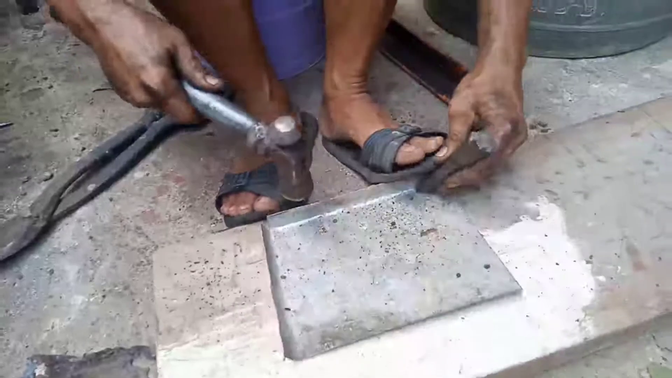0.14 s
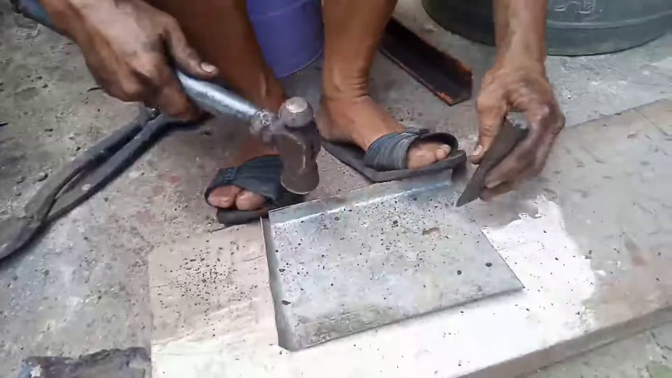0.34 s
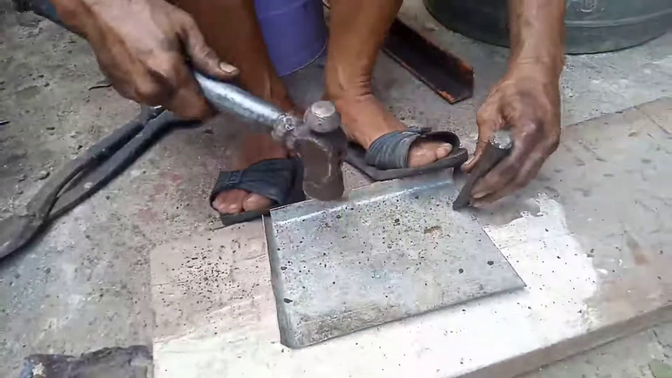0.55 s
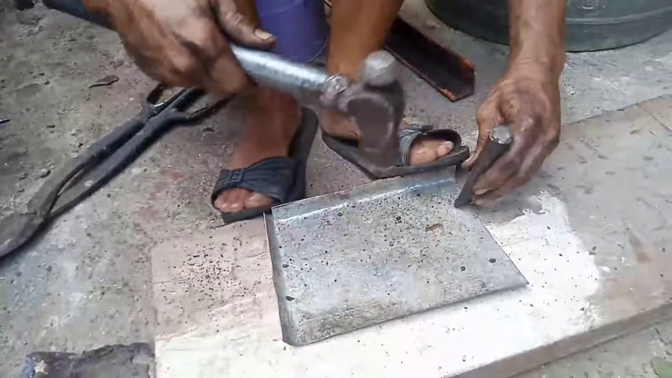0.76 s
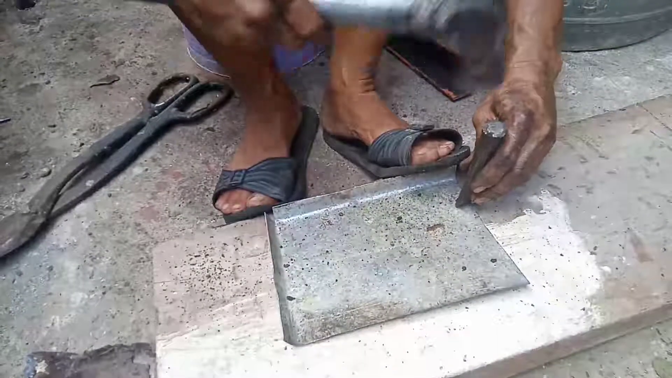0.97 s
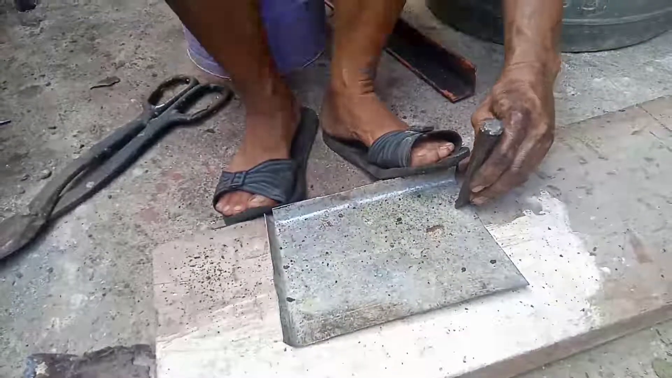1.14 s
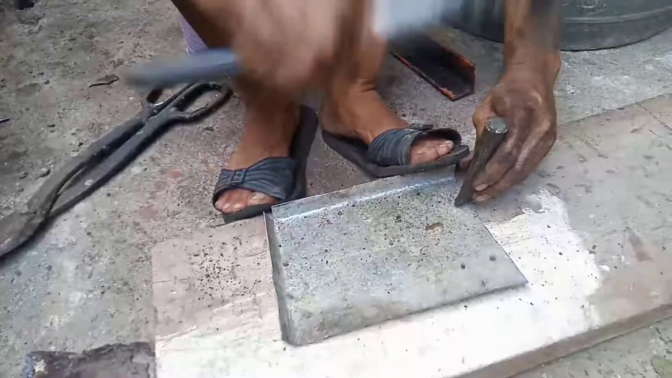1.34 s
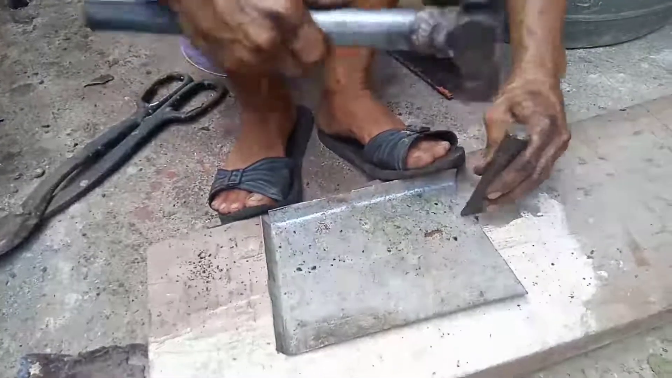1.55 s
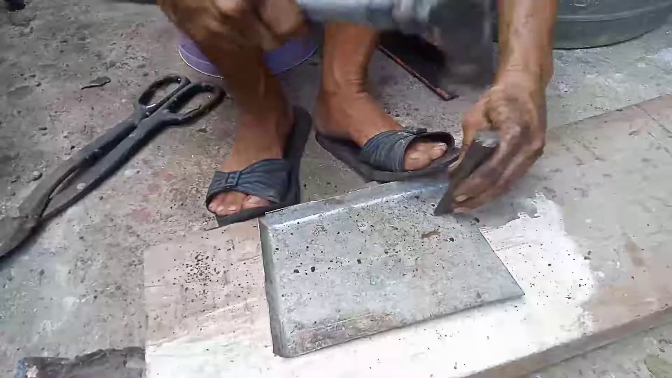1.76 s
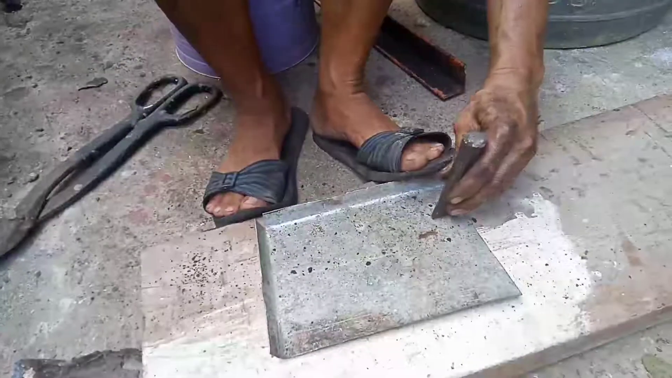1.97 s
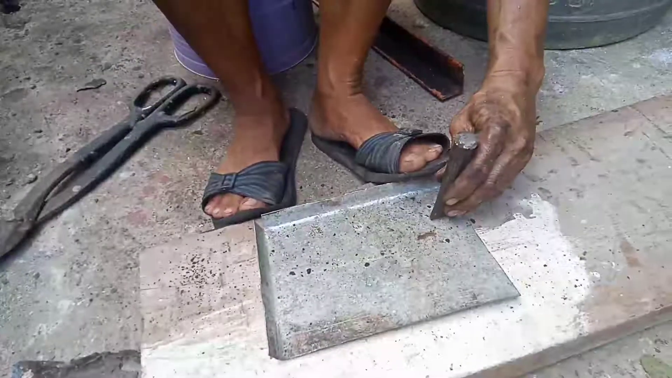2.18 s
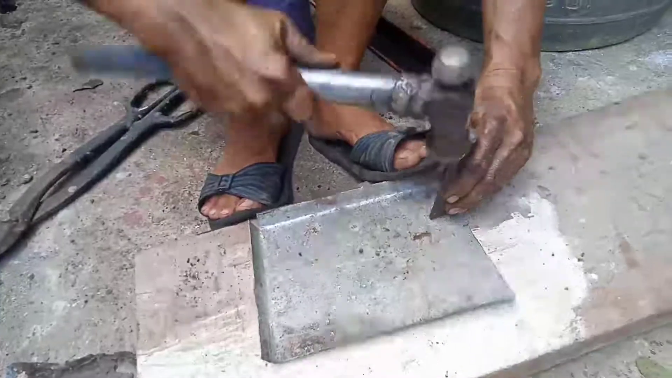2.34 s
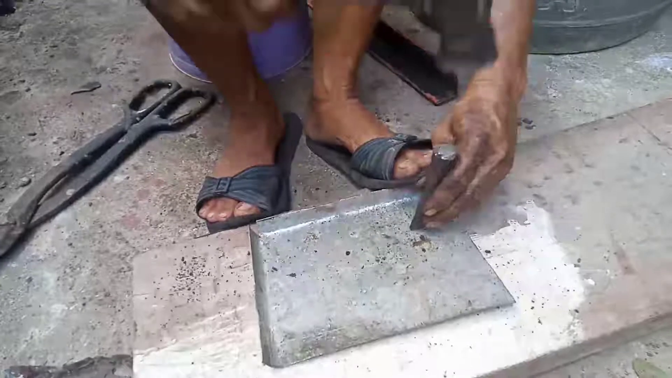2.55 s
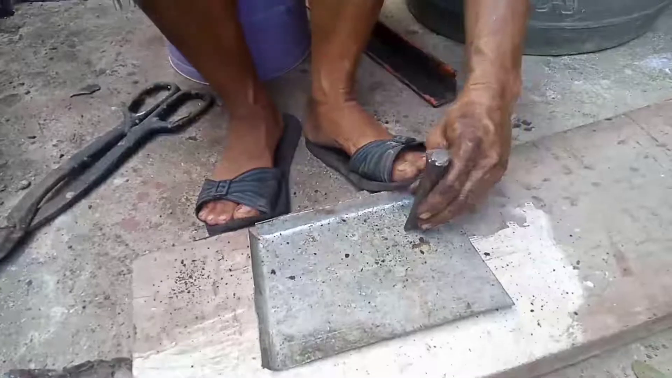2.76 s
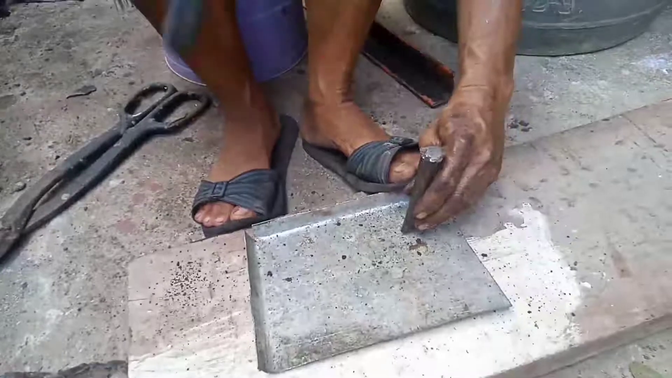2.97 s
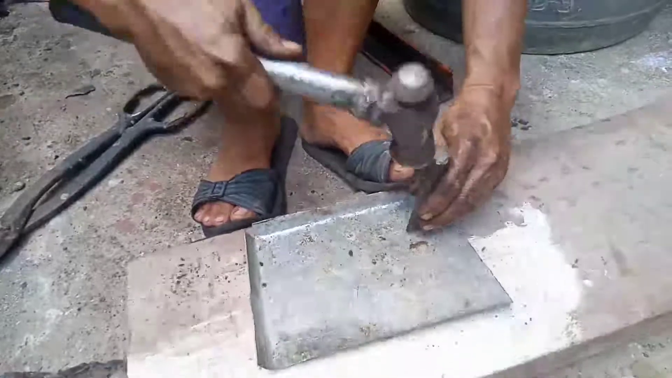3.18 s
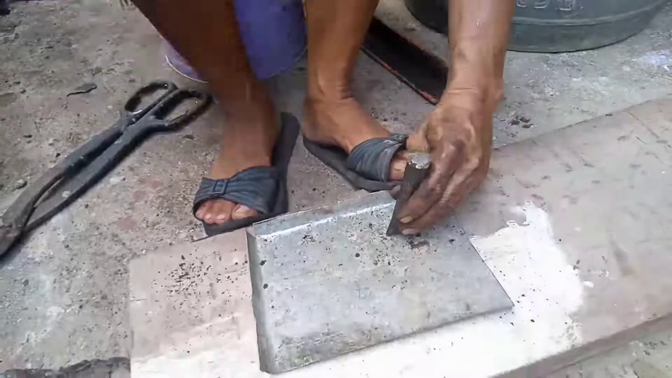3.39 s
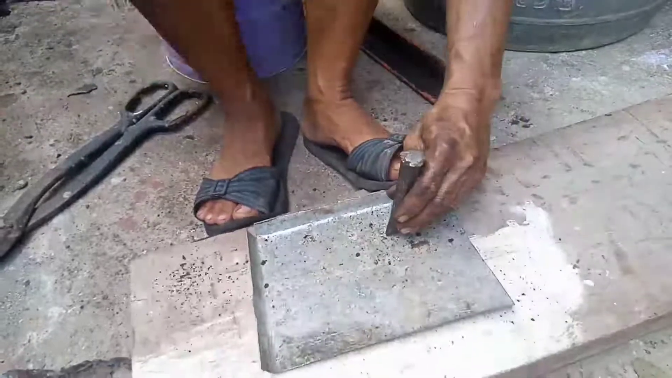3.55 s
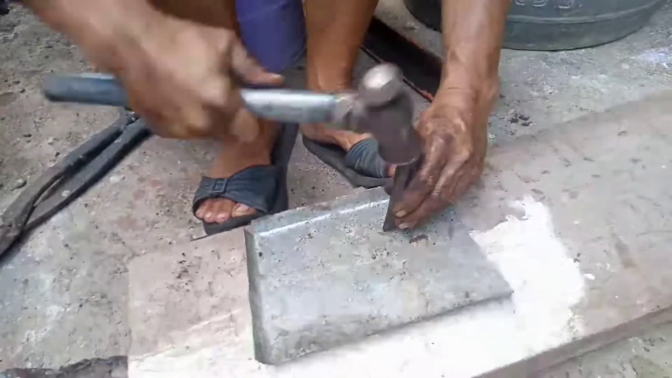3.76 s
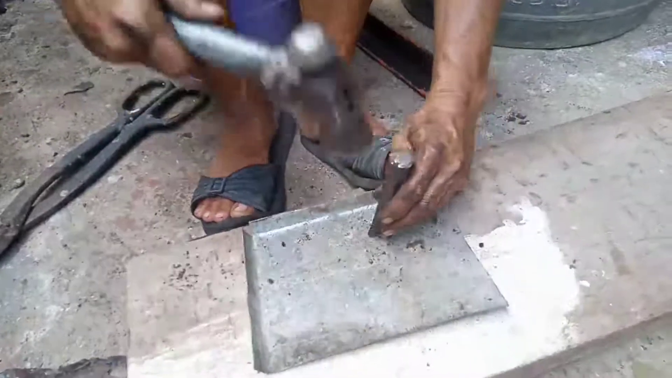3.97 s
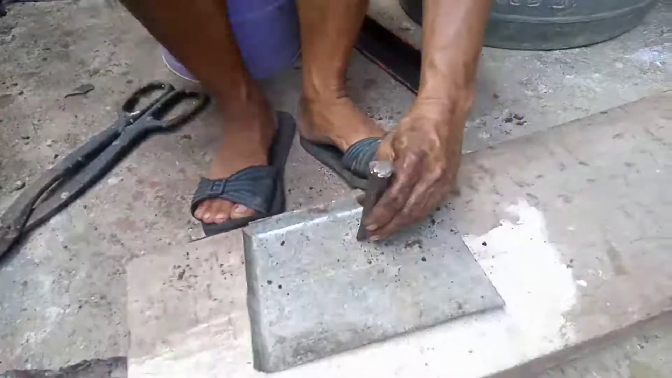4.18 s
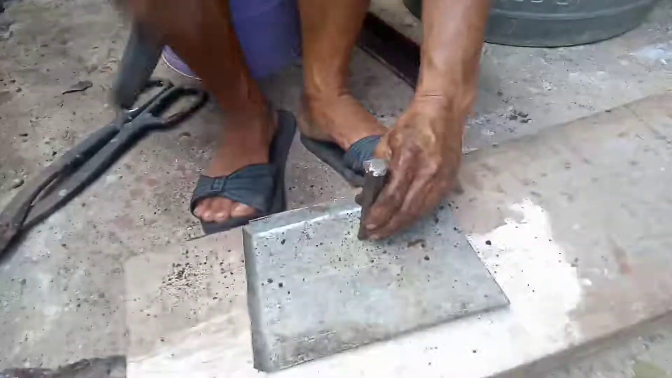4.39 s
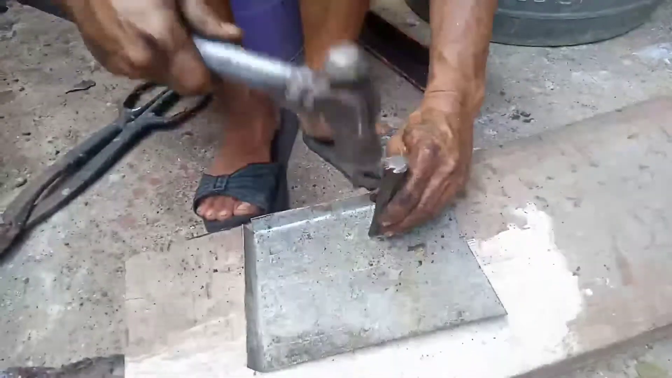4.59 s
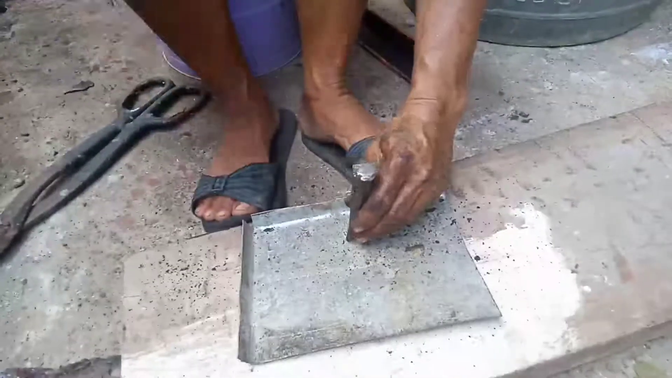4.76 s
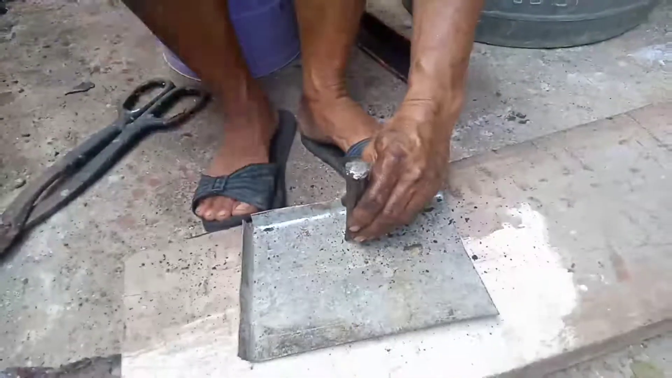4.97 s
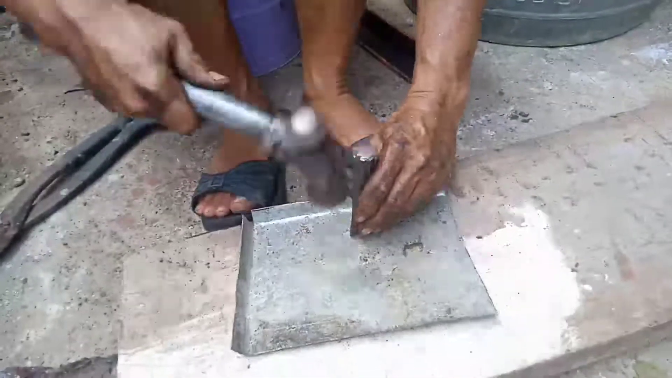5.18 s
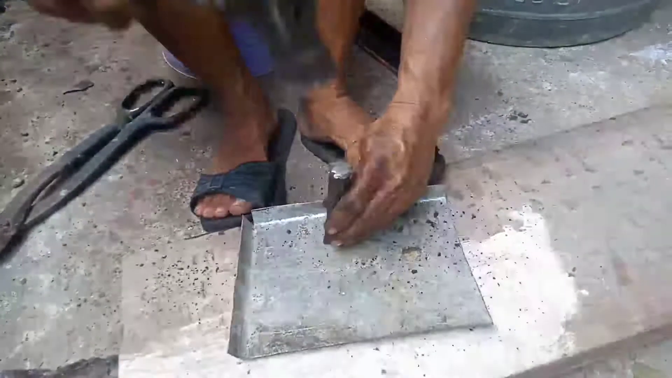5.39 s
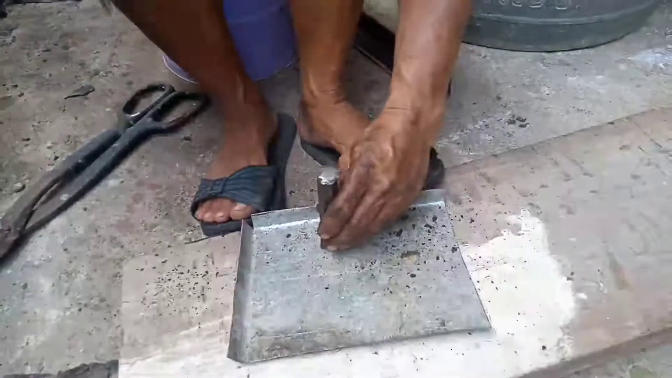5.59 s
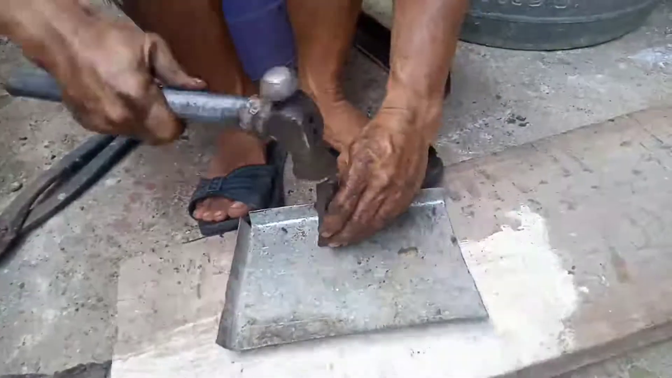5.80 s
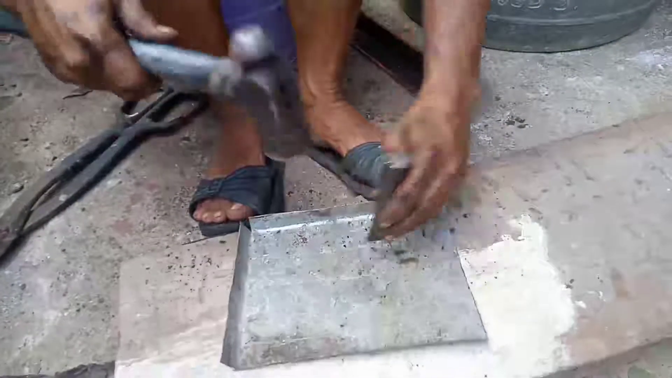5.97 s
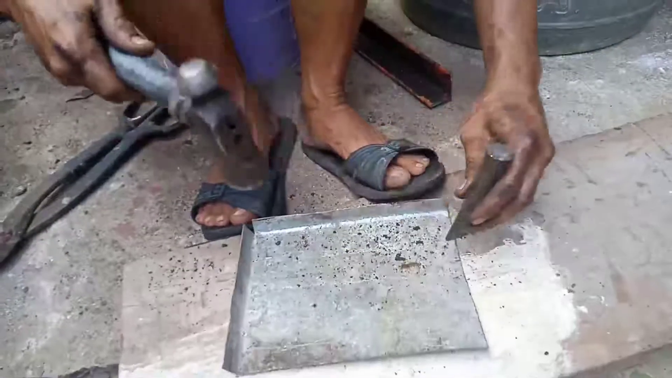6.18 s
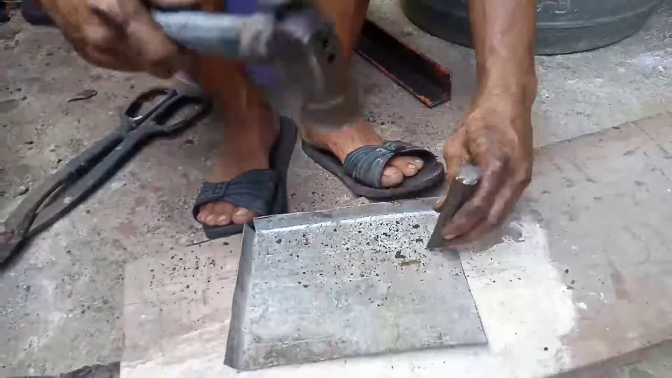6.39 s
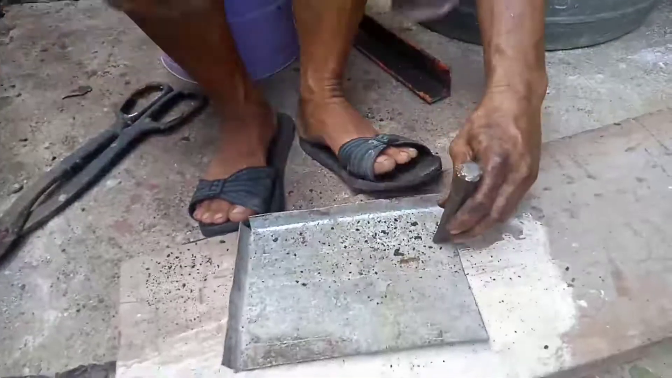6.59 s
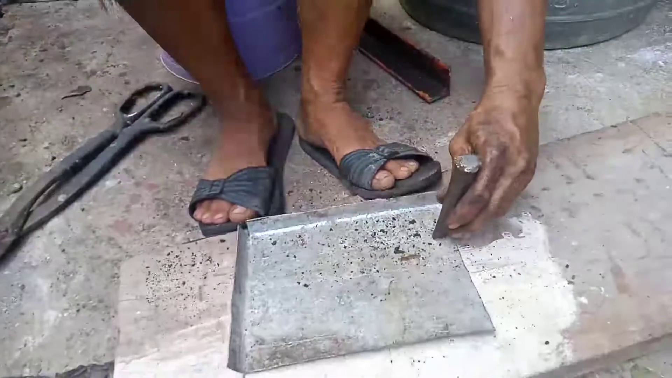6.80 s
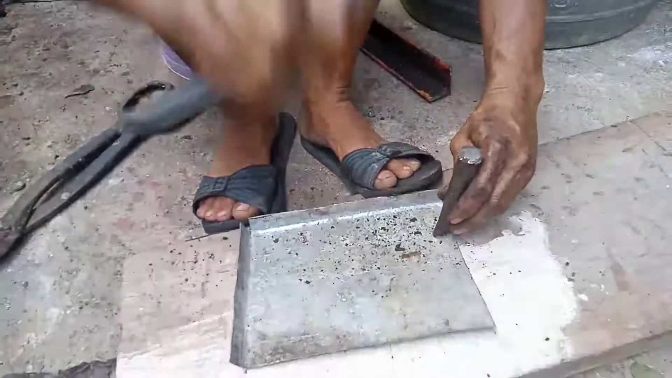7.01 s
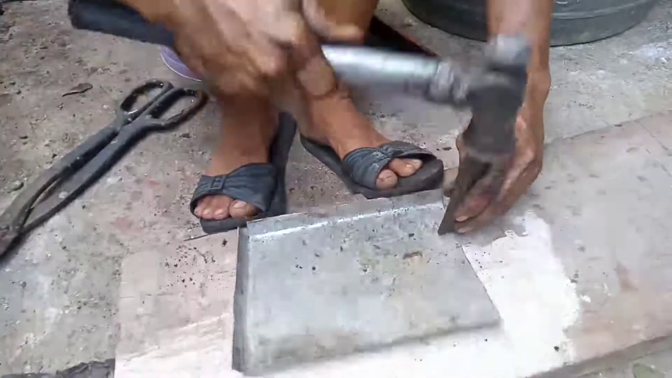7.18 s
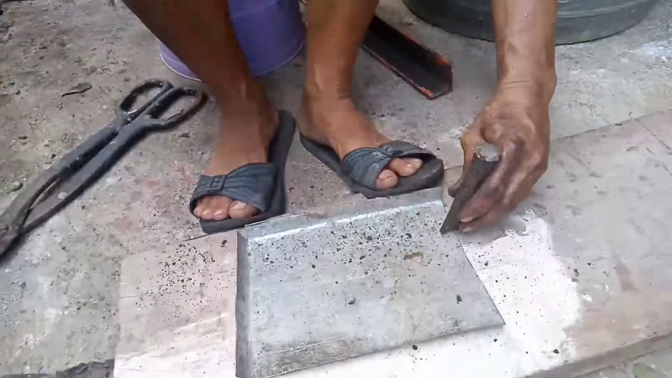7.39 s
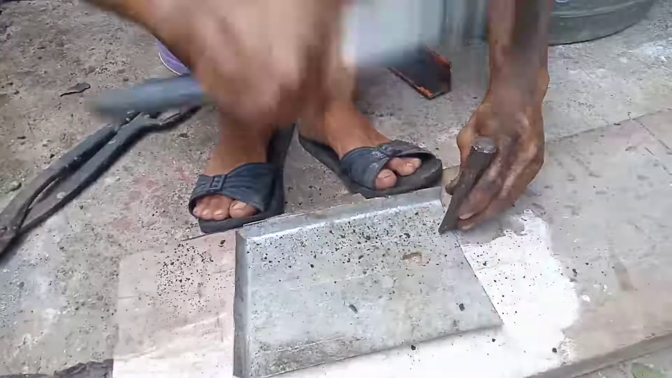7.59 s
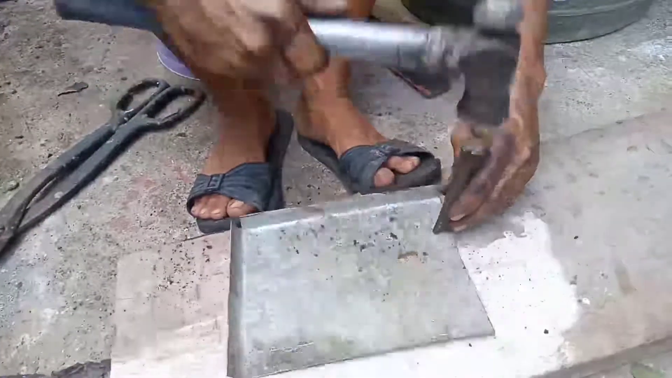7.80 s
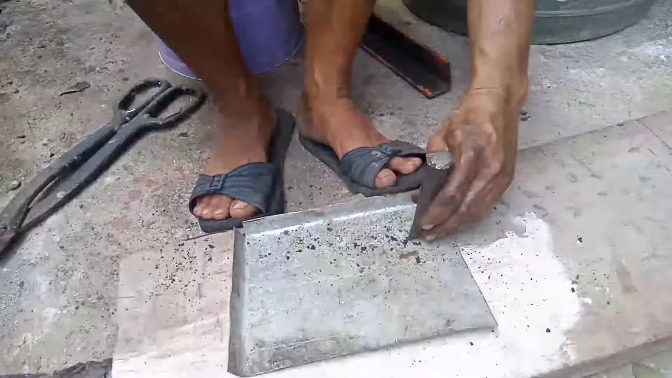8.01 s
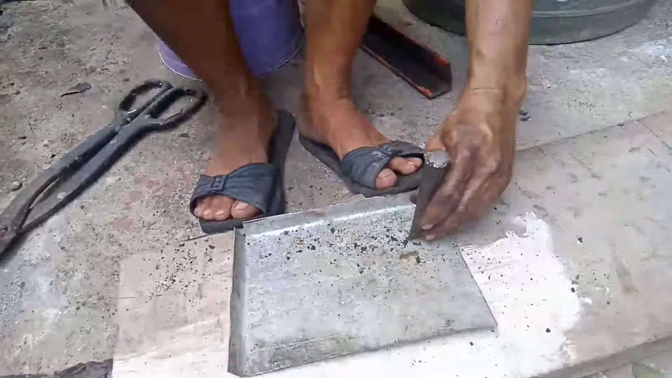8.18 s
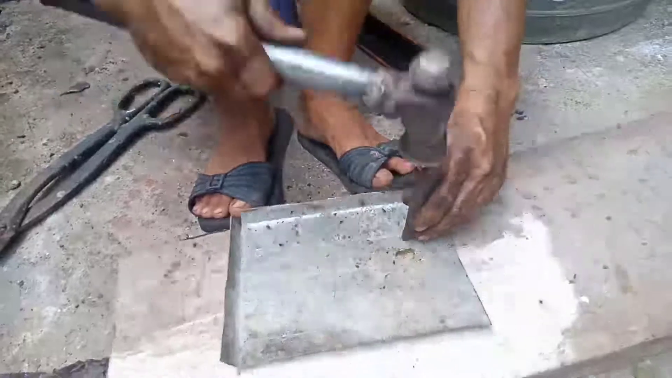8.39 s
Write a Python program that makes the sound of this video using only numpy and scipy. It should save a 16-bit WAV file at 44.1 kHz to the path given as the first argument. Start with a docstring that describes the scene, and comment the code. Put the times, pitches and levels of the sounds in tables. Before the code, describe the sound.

Harsh, distorted metal clangs from hand chiselling a steel sheet, one roughly every 0.7 seconds, with light rattles and faint squeaks between.

```python
"""Chiselling a steel sheet by hand

Ten hammer blows on a chisel, close to a small microphone, ring a steel sheet lying on a wooden block.
Blows and lighter taps are decaying modes over dense clatter; loose steel chinks in short modes and grit.
Narrow noise bands squeak, low noise puffs, faint wavering tones come and go; shaped noise hums behind.
The recorder looks ahead, ducks before every blow, overloads, and lifts the tail as its gain returns."""
import sys
import numpy as np
from scipy import signal
from scipy.io import wavfile
from scipy.ndimage import uniform_filter1d, minimum_filter1d

SR = 44100
rng = np.random.default_rng(int(sys.argv[2]) if len(sys.argv) > 2 else 0)


def store_wav(level_fs):
    """Save 16-bit WAV to argv[1]."""
    pcm = np.round(np.clip(np.atleast_2d(level_fs), -1, 1) * 32767)
    wavfile.write(sys.argv[1], SR, pcm.T.astype(np.int16))


N = 372644


def gain_of(db):
    """Decibels to amplitude gain."""
    return 10 ** (np.asarray(db) / 20)


def evened(x):
    """Scales to rms 1."""
    return x / np.sqrt(np.mean(x ** 2) + 1e-20)


def read(points, hz):
    """Reads a spectrum table on a log-frequency axis."""
    f, value = np.transpose(points)
    return np.interp(np.log(hz + 1), np.log(f + 1), value)


def add(mix, s, sound):
    """Mixes a sound in at time s; what falls outside the mix is cut."""
    at = round(s * SR)
    part = mix[max(at, 0):][:len(sound) + min(at, 0)]
    part += sound[max(-at, 0):][:len(part)]


def noise(count, level_db, size=512):
    """Random spectral frames shaped by level_db(Hz, s), joined into a noise of count samples."""
    hop = size // 4
    frames = count // hop + 5
    hz = np.fft.rfftfreq(size, 1 / SR)[:, None]
    real, imaginary = rng.standard_normal((frames, len(hz), 2)).T
    spectrum = (real + 1j * imaginary) * gain_of(level_db(hz, np.arange(frames) * hop / SR))
    return signal.istft(spectrum, nperseg=size, noverlap=size - hop)[1][:count]


def blow(db, rattle, ring, bright_db, low_db, pair_db, thud_db):
    """Clear modes over a dense clatter; the sheet rattles on the block, which then damps it fast."""
    # clearest modes of the sheet: (frequency [Hz], relative level [dB], 60 dB decay before the ring factor [s])
    sheet = [(325.2, -18.5, 0.37), (651.4, -6.5, 0.43), (781, 1.5, 0.55), (808, 0.5, 0.55), (873, -6, 0.48),
             (1098, -23.5, .5), (1196, -9.5, 0.67), (1388, 0.5, 0.59), (1469, 3.5, 0.25), (1544, -6, 0.41),
             (1679, -1.5, 0.56), (1994, -17, 0.69), (2021, -3, 0.55), (2261, -2.5, 0.52), (2412, -27, .5),
             (2550, -8.5, 0.88), (2710, -44.5, 0.35), (2930, -5, 0.62), (3067, 2.5, 0.26),
             (3262, -12, 0.42), (3450, -9.5, 0.49), (3450, -10, .4), (4140, -9.5, 0.47)]
    # dense unresolved modes: (frequency [Hz], relative level [dB])
    clatter = [(30, -55.5), (100, -23), (216, -7.5), (330, -4.5), (427, -14), (700, -2.5), (1020, -12.5),
               (2070, -7), (3570, -14), (4500, -25), (5330, -43.5), (8800, -47.5), (10500, -51),
               (15000, -50)]
    # their 60 dB decay before the ring factor: (frequency [Hz], decay [s])
    clatter_t60 = [(60, 0.19), (250, 0.26), (700, 0.56), (2000, 0.56), (4000, 0.44), (7000, 0.61),
                   (10500, 0.43), (14000, 0.222)]
    lowest_below_hz, pair_below_hz = 700, 830
    t = np.arange(SR) / SR

    hz, mode_db, t60 = np.transpose(sheet)[:, :, None]
    luck = rng.standard_normal((len(sheet), 3)).T[:, :, None]
    mode_db = mode_db + 2.5 * luck[0] + bright_db * np.log2(hz / 1500)
    mode_db = mode_db + np.select([hz < lowest_below_hz, hz < pair_below_hz], [low_db, pair_db])
    detuned_hz = hz * (1 + 0.00508 * luck[1])
    modes = gain_of(mode_db - 60 * t / (t60 * ring)) * np.sin(2 * np.pi * (detuned_hz * t + luck[2]))

    clusters_db = 4 * rng.standard_normal((257, 1))  # each blow favours other groups of modes

    def dense_db(f, s):
        tilt_db = bright_db * np.log2((f + 50) / 1500)
        return read(clatter, f) + clusters_db + tilt_db - 60 * s / (read(clatter_t60, f) * ring)

    dense = noise(SR, dense_db, size=512)
    thud = noise(SR, lambda f, s: -22 * abs(np.log2((f + 5) / 110)) - 60 * s / 0.27, size=2048)

    # the deep modes escape part of the damping and linger: rise [dB/s], up to [dB]
    linger_db = np.minimum(35.5 * np.maximum(t - rattle, 0), 1)
    modes = modes * np.where(hz < pair_below_hz, gain_of(linger_db), 1)
    ringing = modes.sum(0)

    head = SR // 20  # the parts are balanced over their first 50 ms
    body = gain_of(-5.0) * ringing / ringing[:head].std() + dense / dense[:head].std()
    body = body + gain_of(thud_db) * thud / thud[:head].std()

    bumps = evened(signal.oaconvolve(rng.standard_normal(SR), np.hanning(400), "same"))
    # fast damping begins after the rattle, over a weak remainder
    damped = gain_of(-60 * np.maximum(t - rattle, 0) / (0.21 * ring)) + gain_of(-26.5)
    damped = damped * gain_of(1.2 * bumps)  # the level flickers
    onset = 1 - np.exp(-t / .0006)
    return gain_of(db) * body * damped * onset


def chink(db, middle_db, top_db, grit_db):
    """A short ring of stiff steel in which close modes can beat; a rough contact starts it."""
    # modes of the loose steel: (frequency [Hz], relative level [dB], 60 dB decay [s])
    steel = [(2000, -11, .04), (2552, -3, .06), (2697, 0, .045), (3235, -10, .025), (4160, -18, .05),
             (4880, 3, .045), (4990, 0, .04), (7100, -14, .05), (7560, -3, .06), (7650, 0, .11),
             (8300, -12, .03), (11500, -24, .04)]
    t = np.arange(SR // 5) / SR
    hz, mode_db, t60 = np.transpose(steel)[:, :, None]
    luck = rng.standard_normal((len(steel), 2)).T[:, :, None]
    # middle modes lie from 4500 to 6000 Hz, top modes above
    mode_db = mode_db + 2.5 * luck[0] + middle_db * (hz > 4500) + (top_db - middle_db) * (hz > 6000)
    detuned_hz = hz * (1 + 0.0052 * luck[1])
    ring = (gain_of(mode_db - 60 * t / t60) * np.sin(2 * np.pi * detuned_hz * t)).sum(0)

    scrape = rng.standard_normal(200) * np.exp(-np.arange(200) / 60.0)  # the contact lasts a few ms
    scrape[0] = 7  # its first touch is the hardest
    ring = signal.oaconvolve(ring, scrape / np.linalg.norm(scrape))[:len(t)]

    def contact_db(f, s):
        middle_hump_db = -34 * abs(np.log2((f + 50) / 3000))
        top_hump_db = top_db - 60 * abs(np.log2((f + 50) / 7700))
        return np.maximum(middle_hump_db, top_hump_db) - 60 * s / .045

    grit = noise(len(t), contact_db, size=128)
    both = ring + gain_of(grit_db) * grit / grit[:200].std()
    return gain_of(db) * both * (1 - np.exp(-(t / .0015) ** 2))


def chatter(length, db):
    """Loose steel repeats faint chinks at uneven short gaps, starting softly."""
    gap_s, spread_db = .011, 1.5
    rise_db, rise_s = 5.5, 0.018
    out = np.zeros(SR // 2)
    luck = rng.standard_normal((14, 2))
    for k, (late, loud) in enumerate(luck):
        s = gap_s * (k + .3 * late * (k > 0))
        level_db = db + spread_db * loud - rise_db * np.exp(-s / rise_s)
        sound = chink(level_db, middle_db=-17.5, top_db=-42, grit_db=-12.5)
        add(out, s, sound * (s < length))
    return out


def whistle(length, hz, width, db):
    """Slow complex noise carried on a pitch: a narrow squeaking band that swells quickly and fades."""
    count = round(length * SR)
    slow = rng.standard_normal((2, SR))
    slow = signal.lfilter([1], [1, -np.exp(-np.pi * width / SR)], slow, axis=1)
    slow = signal.lfilter([1], [1, -np.exp(-2 * np.pi * width / SR)], slow, axis=1)[:, -count:]
    carrier = np.exp(2j * np.pi * hz * np.arange(count) / SR)
    band = ((slow[0] + 1j * slow[1]) * carrier).real
    fade = gain_of(-15. * np.arange(count) / count)
    return gain_of(db) * evened(band) * signal.windows.tukey(count, .45) * fade


def puff(length, hz, db):
    """A lump of low noise as the arm swings past the microphone."""
    count = round(length * SR)
    air = noise(SR // 4, lambda f, s: -14 * abs(np.log2((f + 20) / hz)) + 0 * s, size=1024)
    return gain_of(db) * evened(air[2000:][:count]) * np.hanning(count)


def tone(length, hz, db):
    """A near-steady tone that grows slowly and wavers a little in pitch and level."""
    t = np.arange(round(length * SR)) / SR
    waver = evened(signal.oaconvolve(rng.standard_normal((2, len(t))), np.hanning(3000)[None], "same"))
    turns = np.cumsum(hz + 4 * waver[0]) / SR
    level = gain_of(db + 1.5 * waver[1] + 5 * t / length)
    return level * np.sin(2 * np.pi * turns) * signal.windows.tukey(len(t), .3)


def hum():
    """Workshop background: shaped noise with small lumps, raised and lowered by the recorder's slow gain."""
    # spectrum of the background: (frequency [Hz], relative level [dB])
    hum_spectrum = [(15, -52.5), (30, -25.5), (49, -28.5), (100, -2.5), (301, -5), (404, -12.5), (543, -4),
                    (833, -9), (1150, -10), (1910, -10.5), (2560, -15), (3180, -13.5), (5720, -43),
                    (8500, -47.5), (15000, -49.5)]
    # background level under the recorder's slow automatic gain: (time [s], relative level [dB])
    hum_level = [(0.0, -53.5), (0.4, -49), (1.39, -35), (1.81, -40), (2.28, -35.5), (2.7, -39),
                 (3.6, -41.5), (4.1, -42.5), (5.8, -45.5), (6.199, -51), (7.101, -39.5), (7.8, -48),
                 (8.45, -45.5)]
    lumps = rng.standard_normal((N // 256 + 5, 513))
    lumps = uniform_filter1d(uniform_filter1d(lumps, 10, 0), 12, 1)  # over time, then frequency
    lumps = evened(lumps).T
    wash = evened(noise(N, lambda f, s: read(hum_spectrum, f) + 1.5 * lumps, size=1024))
    return wash * gain_of(4.0 + np.interp(np.arange(N) / SR, *np.transpose(hum_level)))


def room(x):
    """Diffuse reflections of the workshop: a decaying noise tail of energy 1."""
    # 60 dB decay of the room: (frequency [Hz], decay [s])
    room_t60 = [(200, 0.25), (2000, 0.2), (8000, 0.56)]
    tail = noise(SR // 2, lambda f, s: -60 * s / read(room_t60, f), size=256)
    return signal.fftconvolve(x, tail / np.linalg.norm(tail))[:N]


def scene():
    """The small sounds get the room; the clatter of the blows already holds it."""
    # all levels are relative, ahead of the limiter and overload in record()
    # hammer blows: (time [s], strength [dB], rattle [s], lowest modes [dB], close pair above them [dB])
    blows = [(1.3284, 21, 0.058, 11, 5), (2.2725, 24.5, 0.06, 0, 5), (3.0312, 20, 0.061, 9.5, 6),
             (3.7391, 18.5, 0.055, 15.5, 2.5), (4.4307, 14.5, 0.049, 9.5, 0), (5.0927, 12, 0.051, 10, 0.5),
             (5.7691, 9, 0.041, 16, 1), (7.0112, 18.5, 0.055, 4, 5.5), (7.596, 8.5, 0.095, 2, 0),
             (8.27, 7.5, 0.065, 6, 2.5)]
    # light taps and bounces on the sheet; the first row is an earlier blow still dying away:
    # (time [s], strength [dB], ring time factor)
    taps = [(-.03, -19.5, 1.88), (.5652, -40, 0.85), (1.7518, -23, 1.1), (2.4165, -2, 1.2),
            (5.955, -24.5, 2.7), (6.4228, -37, 2), (6.5372, -39, 0.78), (7.2117, -18.5, 1.6),
            (8.4067, -12.5, 2.4)]
    # clear chinks of loose steel: (time [s], level [dB], top modes [dB], grit of the contact [dB])
    chinks = [(1.1508, -18, -29, -12), (2.139, -13.5, -43, -17), (2.1634, -22.5, -25.5, 6.5),
              (2.262, -5.5, -28, -12), (2.8757, -23, -46, -26), (3.6201, -16, -45, -9),
              (3.6314, -25, -32, 0), (3.6625, -9.5, -32, -12), (3.687, -12, -7, -13),
              (3.699, -11, -26, -14), (4.301, -12.5, -33, -18), (4.325, -10.5, -21.5, -13),
              (4.343, -9, -11, -12), (4.966, -20.5, -51, -17), (5.0843, -19, -31, -13),
              (5.6443, -20, -17, -9), (6.878, -17.5, -46, -13), (6.8982, -20, -33, 3.5),
              (6.9167, -23, -26, -5), (6.9846, -6, -36, -14), (6.9957, -4, -17, -12),
              (7.4619, -15.5, -44, -15), (7.483, -11.5, -39, -14), (7.4942, -7.5, -21, -16),
              (7.5038, -14, -15, -12), (7.515, -21, -8, -10), (8.1616, -12, -16, -18),
              (8.1749, -22, -7, -12)]
    # low puffs of the swinging arm: (time [s], level [dB])
    puffs = [(2.19, -29), (3.68, -19.5), (4.34, -25.5), (6.892, -42), (7.496, -31.5), (8.159, -29)]
    # stretches of faint loose-steel chatter: (start [s], length [s], level [dB])
    chatters = [(3.5768, 0.18, -20.5), (4.2818, 0.1, -23.5), (4.95, .07, -29), (5.655, 0.02, -27),
                (6.8632, 0.15, -24.5), (7.4568, 0.069, -21), (8.1337, 0.061, -26)]
    # thin wavering squeaks: (time [s], length [s], pitch [Hz], filter width [Hz], level [dB])
    whistles = [(0.738, .1, 6240, 980, -57), (1.859, 0.12, 6240, 75, -48), (1.869, 0.14, 3120, 80, -40),
                (1.88, .27, 8500, 1800, -59), (1.894, 0.16, 4660, 370, -38.5), (1.913, .15, 6640, 610, -49),
                (1.966, 0.15, 3764, 70, -27), (2.01, .06, 8700, 150, -61), (2.013, 0.16, 4400, 139, -35.5),
                (4.02, 0.39, 7500, 1500, -60), (4.116, 0.12, 3915, 87, -34), (4.166, .22, 5080, 150, -47.5),
                (5.5, 0.1, 4800, 100, -49), (5.543, 0.15, 4170, 130, -39), (5.54, .2, 8350, 350, -63),
                (5.548, 0.17, 6450, 300, -61), (5.676, 0.14, 4330, 85, -40), (5.65, .11, 3830, 74, -38),
                (7.27, 0.15, 4270, 250, -43), (7.36, 0.13, 3680, 250, -37), (7.41, .05, 7000, 80, -62)]
    # faint low tones that come and go: (time [s], length [s], pitch [Hz], starting level [dB])
    tones = [(1.78, .47, 545, -45), (6.35, .66, 543, -44.5)]

    mix, small = hum(), np.zeros(N)
    for s, db, rattle, low_db, pair_db in blows:
        # a harder blow presses the sheet down and rings shorter: the factor halves every 29 dB
        ring = 2.0117 * 2 ** (-db / 29)
        thud_db = -13 - 0.41 * db  # the block's thud lags behind as the strength grows
        add(mix, s, blow(db, rattle, ring, 1.5, low_db, pair_db, thud_db))
    for s, db, ring in taps:
        add(mix, s, blow(db, .012, ring, bright_db=1.5, low_db=13.5, pair_db=2., thud_db=-31))
    for s, db, top_db, grit_db in chinks:
        add(small, s, chink(db, -21, top_db, grit_db))
    for s, db in puffs:
        add(small, s, puff(length=0.022, hz=130, db=db))
    for table, source in ((chatters, chatter), (whistles, whistle), (tones, tone)):
        for s, *row in table:
            add(small, s, source(*row))
    return (mix + small + gain_of(-8.5) * room(small))[None]


def record(dry):
    """Look-ahead gain control of limited depth, a limiter, overload, a dull capsule and the band limit."""
    power_db = 10 * np.log10(abs(uniform_filter1d(dry[0] ** 2, 300)) + 1e-12)
    over_db = np.clip(power_db + 15.5, 0, 14.)  # the gain can fall only so far, so blows still overload
    fall = np.arange(N) * 211.0 / SR  # recovery in dB a second
    held_db = np.maximum.accumulate(over_db + fall) - fall
    ahead = 800  # samples of look-ahead
    ahead_db = -minimum_filter1d(-held_db, ahead, origin=-(ahead // 2))
    ducked = dry / gain_of(uniform_filter1d(ahead_db, 500))

    # a fast limiter takes a few dB more
    peak_db = 20 * np.log10(-minimum_filter1d(-abs(ducked), 200) + 1e-9)
    limited = ducked / gain_of(uniform_filter1d(np.clip(peak_db - 3.5, 0, 5.), 150))
    # the converter overloads with a hard knee
    flat = .83 * limited / (1 + abs(limited) ** 24) ** (1 / 24)

    dull = signal.sosfilt(signal.butter(2, 7600, fs=SR, output='sos'), flat)
    dull = signal.sosfilt(signal.butter(2, 45., 'high', fs=SR, output='sos'), dull)
    band_limit = signal.firwin(511, 16100, window=("kaiser", 9), fs=SR)
    return signal.oaconvolve(dull, band_limit[None], "same")


dry = scene()
out = record(dry)
store_wav(out)
```